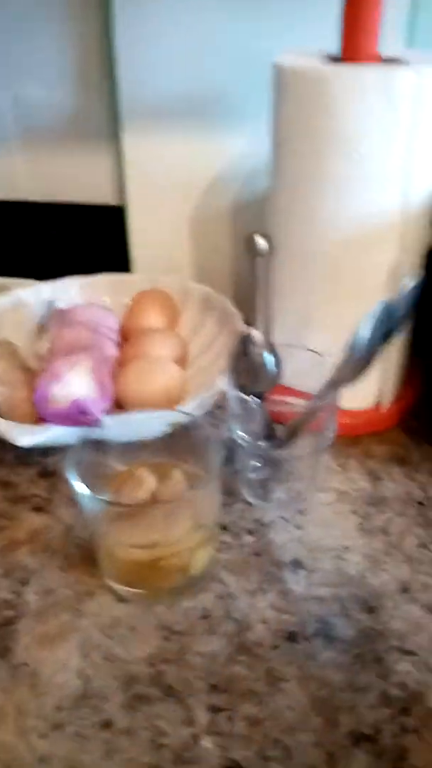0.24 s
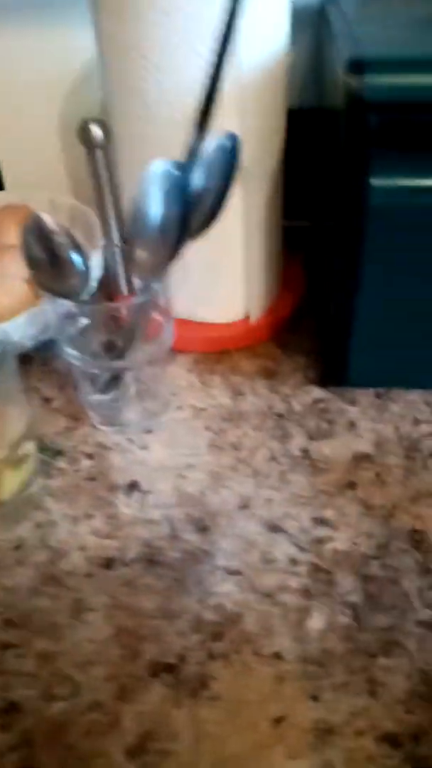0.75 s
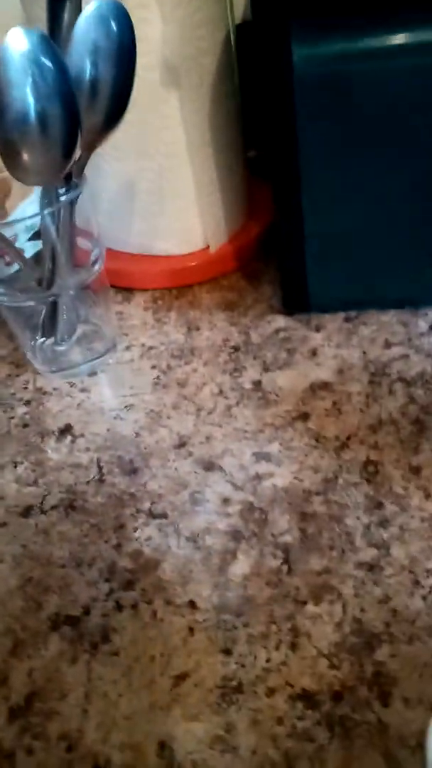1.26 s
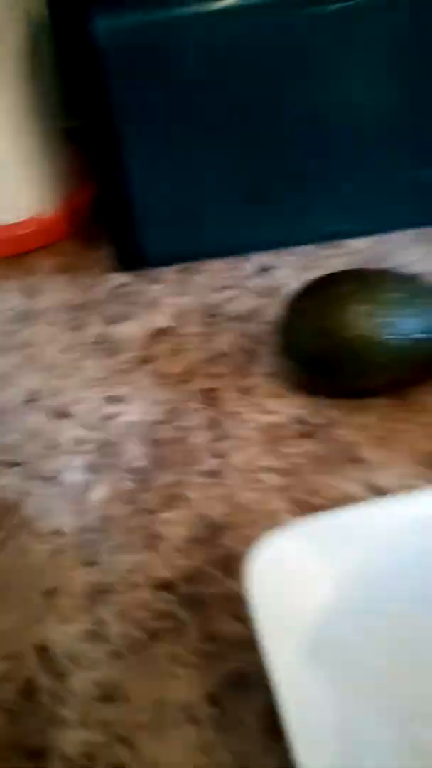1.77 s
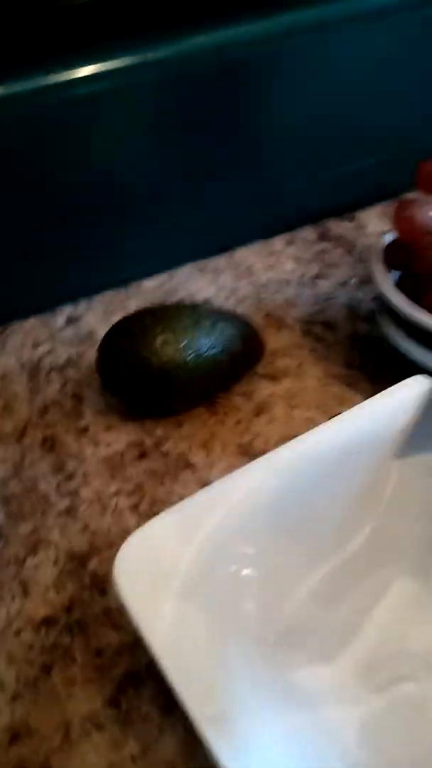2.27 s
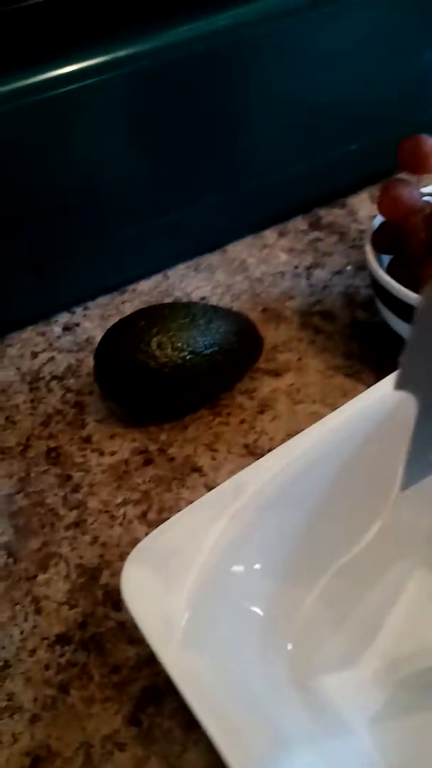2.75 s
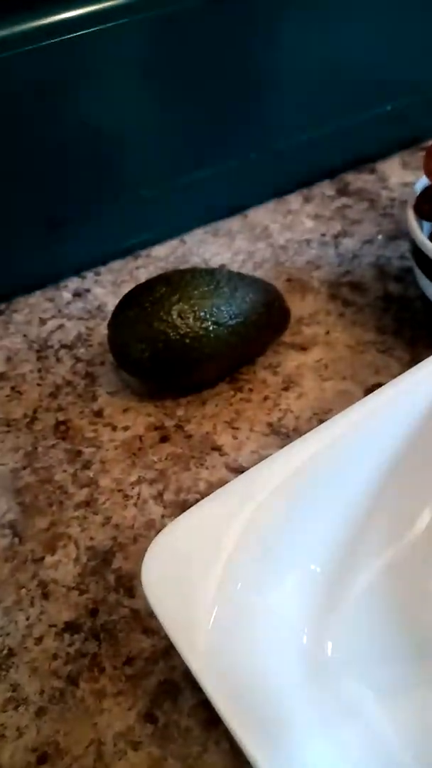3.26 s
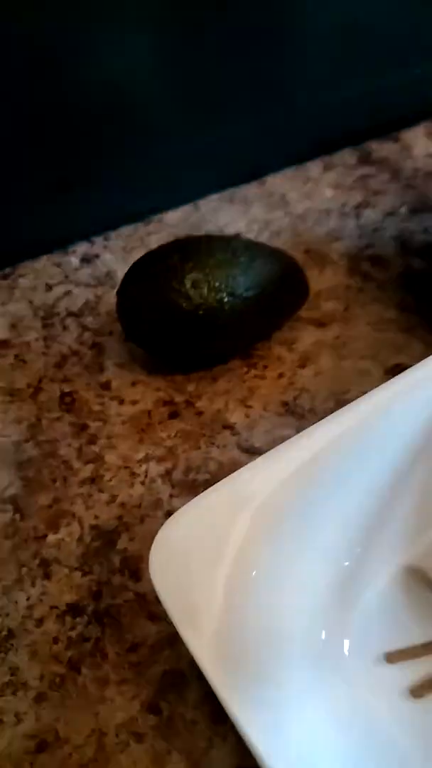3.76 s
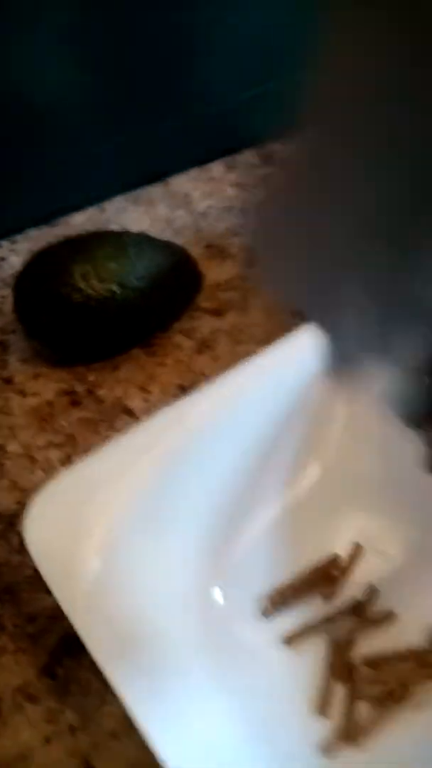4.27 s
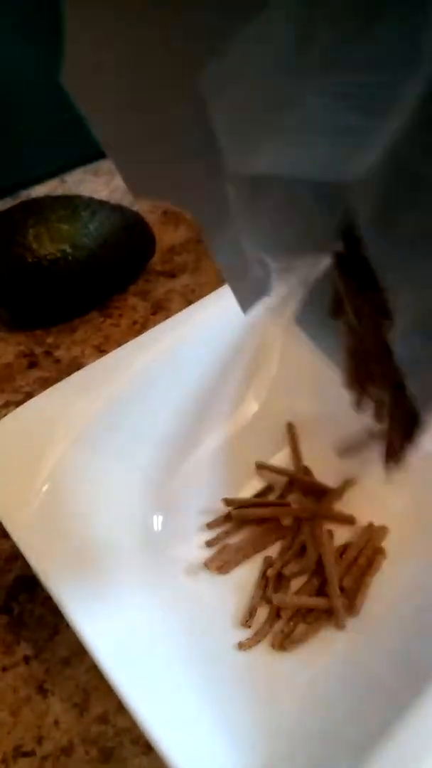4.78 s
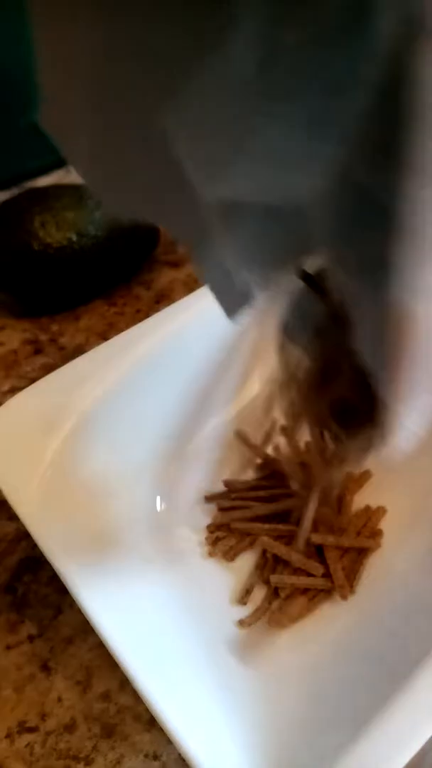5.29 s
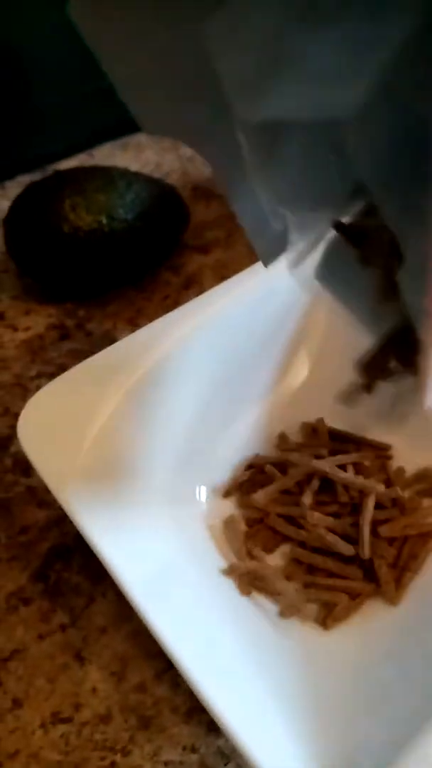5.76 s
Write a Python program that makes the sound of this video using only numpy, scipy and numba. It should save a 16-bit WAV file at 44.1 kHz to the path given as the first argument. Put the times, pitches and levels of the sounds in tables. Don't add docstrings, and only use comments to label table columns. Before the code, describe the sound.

A quiet kitchen, heard close by a stereo phone, with faint still air and a slight uneven whirr. From 0 to 0.5 s there are only tiny film touches and soft hollow knocks of sticks settling. Faint crinkles begin around 0.55 s, and from 0.9 s a plastic bag is lifted with growing crackle, a strong snap near 1.3 s, then sustained rustling that thins out by 2 s. A lull follows, with low dull knocks around 2.4-2.5 s. From 2.75 s the bag crackles again as it tilts, moving from the left toward the centre. At about 3.4 s a sharp crease comes with the first bright, high ceramic pings. Until 6 s, uneven shakes bring dense dry rattling, sliding sticks and loud crisp snaps, strong near 4.5, 5.0 and 5.5 s. Pings grow shorter and duller as the pile covers the bowl; it ends still shaking.

```python
import sys
import numpy as np
from scipy import signal
from scipy.fft import rfft, irfft, next_fast_len
from scipy.io import wavfile
from numba import njit

SR = 44100
rng = np.random.default_rng(int(sys.argv[2]) if len(sys.argv) > 2 else 0)


def invert_db(level):
    return 10 ** (np.asarray(level, dtype=float) / 20)


def transcribe(signal):
    frames = np.atleast_2d(signal).T
    limited = np.clip(frames, -1, 1)
    pcm = np.round(limited * 32767).astype(np.int16)
    wavfile.write(sys.argv[1], SR, pcm)


N = 265771

# (time [s], peak level [dB], mode struck best [Hz])
GLAZE_HITS = [(3.433, -23.5, 8680), (3.5406, -27.5, 8670), (3.5638, -26, 8200), (3.6173, -31, 8190),
              (3.6618, -25, 8190), (3.6941, -34, 8190), (3.7549, -31.5, 8190), (4.0322, -24, 8183),
              (4.0814, -31.5, 9120), (4.1325, -29.5, 9550), (4.4018, -54, 8140), (4.4696, -40.5, 9120),
              (4.5855, -26, 9550), (4.628, -34, 8190), (4.8549, -32, 7370), (4.997, -36, 8190),
              (5.2065, -50, 8690), (5.2436, -33, 9430), (5.3296, -35, 8190), (5.3687, -34.5, 7360),
              (5.3834, -33, 8670), (5.5717, -35, 9080), (5.716, -30, 9110)]
# (frequency [Hz], left [dB per Hz], right [dB per Hz])
PORT_COLOUR = [(39, -42, -31), (92.6, -26.5, 5.5), (231, 3.5, 0.5), (670, -6, 4.5), (1510, -5, -1.5),
               (2190, 3, -0.5), (3240, -4, 0), (5200, 5.5, 3), (7560, 1, 2.5), (9490, -6, 6.5),
               (10900, -12, -5), (12940, -83, -11), (15200, -13, -2), (16400, -50, -24)]


def rustle(count=18000, size=6):
    chance = rng.random((count, 2 + 3 * size))
    s = np.repeat(chance[:, 0] * N / SR, size)
    slip_db = np.minimum(-2.5 * np.log(chance[:, 1]), 10)
    slip_db = np.repeat(slip_db, size)
    pitch, own, late = (c.ravel() for c in np.split(chance[:, 2:], 3, axis=1))
    hz = 50 * 320 ** pitch
    level_db, load_db = bag(s)
    thud_db, rattle_db = load_db + 1, 0.94 * load_db + 5
    low = np.clip(np.log2(1300 / hz), 0, 1)
    mid = np.clip(1 - abs(np.log2(hz / 1700)) / 1.76, 0, 1)
    db = level_db + low * thud_db + mid * rattle_db
    db += slip_db * (1 + .6 * low) + 5 * (2 * own - 1)
    db += 20 * np.log10(hz / 6000) + 4
    return ports(s + .002 * late, hz, 14.12 / hz, 0.64 / hz, db)


def bag(s):
    # (start [s], swell [s], peak level [dB], hold [s],
    # weight of sticks shifting [dB])
    bag_moves = [
        (0.0, 0.0014, -68, 0.012, 8.5),
        (0.077, 0.0081, -78, 0.077, 9),
        (0.541, 0.043, -72, 0.12, 13.5),
        (.62, .12, -68.5, 0.23, 12.5),
        (0.872, 0.11, -62, .1, 9.5),
        (0.94, 0.23, -51, .13, 4),
        (1.275, 0.082, -42.5, 0.62, 1),
        (1.98, 0.034, -77.5, 0.15, 13),
        (2.217, .02, -77.5, 0.026, 16),
        (2.392, 0.019, -77, 0.3, 18.5),
                 (2.48, .26, -60.5, 0.13, 9), (2.79, .04, -54, 0.36, 5.5), (2.9, .18, -46, .15, 3),
               (3.148, 0.13, -45.5, 0.14, 2.5), (3.36, 0.097, -42.5, 0.013, -1.5),
               (3.448, 0.15, -54, .1, -1.5), (3.683, 0.033, -50.5, 0.4, 7), (3.748, 0.21, -43, 0.4, 2.5),
               (4.152, 0.22, -45.5, .04, 2), (4.432, 0.036, -40.5, 0.02, -3),
               (4.518, 0.041, -46, 0.32, 0.5), (4.937, 0.059, -47.5, 0.091, 4.5),
               (4.948, 0.15, -40.5, 0.22, -1.5), (5.248, 0.14, -48.5, .2, -1),
               (5.488, 0.098, -43.5, 0.36, -1), (5.715, 0.014, -58, 0.018, 13),
               (5.952, 0.071, -47, .1, 1.5)]
    swell_db_per_decade, sag_db_per_s, stop_db_per_s, still_db = 27.5, 25.5, 197, -85
    lurch_db, lurch_s = 8.5, 0.043

    t = np.arange(0, N / SR + .002, .002)
    moves = np.array(bag_moves)
    start, swell, peak_db, hold, weight_db = moves.T[:, :, None]
    age = np.maximum(t - start, 1e-9)
    after = np.maximum(age - swell, 0)
    db = peak_db + swell_db_per_decade * np.log10(np.minimum(age / swell, 1))
    db -= sag_db_per_s * after + stop_db_per_s * np.maximum(after - hold, 0)
    power = invert_db(2 * db)
    total = power.sum(axis=0) + invert_db(2 * still_db)
    shift_db = weight_db + lurch_db * np.exp(-age / lurch_s)
    load_db = (power * shift_db).sum(axis=0) / total
    return curve(np.c_[t, 10 * np.log10(total), load_db], s)


def creases(size=48):
    length_s = .0021
    s, peak_db, peak_hz, low_db = (np.repeat(c, size) for c in all_creases().T)
    chance = rng.random((len(s), 3)).T
    hz = 150 * 108 ** chance[0]
    octaves = np.log2(hz / peak_hz)
    near = np.exp(-(octaves / 0.43) ** 2)
    db = 3.7 * near + np.clip(np.log2(2200 / hz), 0, 1) * low_db
    db += 20 * np.log10(hz / peak_hz)
    db -= 3.6 * np.maximum(octaves, 0) * (peak_hz < 3500)
    db += 5 * chance[2] - 6 * chance[1] + 4.8 * (hz > 11000)
    mic_hz, left, right = np.transpose(PORT_COLOUR)
    heard = invert_db(2 * db + np.interp(np.log(hz), np.log(mic_hz), left + right))
    heard = heard.reshape(-1, size).sum(axis=1)
    db += peak_db + 5.5 - 10 * np.log10(np.repeat(heard, size))
    s = s - .0004 + 1.4 * length_s * chance[1] ** 1.4
    return ports(s, hz, 10.76 / hz + 0.45 * length_s * near, 0.75 / hz + .0001, db)


def all_creases():
    # (time [s], peak level [dB], pitch [Hz])
    grips = [(.084, -40, 1260), (.5707, -38, 2120), (.7393, -39, 1250), (.8974, -56.5, 1250),
             (.9598, -20, 7560), (1.079, -27.5, 4370), (1.103, -26.5, 1160), (1.1289, -24, 4440),
             (1.1537, -20, 4360), (1.1982, -42, 1080), (1.2452, -22.5, 1260), (1.2865, -24, 2100),
             (1.314, -20.5, 4570), (1.3284, -12, 2010), (1.5572, -23, 4520), (1.8408, -26, 4710),
             (2.102, -40, 2180), (2.141, -55, 1760), (2.2409, -42, 1960), (2.403, -43, 1190),
             (2.7495, -46, 2420), (2.7612, -30, 4800), (2.8285, -25.5, 2230)]
    slumps = [(3.0216, -18.5, 5300), (3.0725, -18, 4500), (3.238, -19.5, 5230), (3.246, -23, 8600),
              (3.274, -15.5, 9070), (3.3314, -21.5, 6800), (3.6926, -22, 8500), (3.8188, -19, 8050),
              (3.838, -21, 9050), (3.8652, -13.5, 5550), (4.061, -13, 6350), (4.1785, -18, 9250),
              (4.2846, -18, 6900), (4.3695, -15.5, 5540), (4.4, -19, 5940), (4.4698, -9.5, 9000),
              (4.5499, -13.5, 9200), (4.6714, -14.5, 7350), (4.7821, -22, 5400), (4.943, -27.5, 9400),
              (4.9727, -10, 5870), (4.982, -16, 6000), (5.0231, -22, 5470), (5.0515, -16, 5030),
              (5.062, -17, 5230), (5.1533, -17.5, 6510), (5.259, -17, 6260), (5.5708, -20, 6440),
              (5.6078, -13, 5400), (5.8172, -16.5, 5800)]
    snaps = [(.003, -37.5, 1440), (.5951, -28.5, 1360), (.606, -29.5, 1390), (.9159, -31.5, 1862),
             (1.0221, -25, 1940), (1.3554, -17, 6240), (1.7181, -29, 5430), (1.7689, -22, 5300),
             (1.7989, -19.5, 5000), (1.8592, -29, 5460), (1.9471, -26, 4700), (2.0383, -30, 5400),
             (2.8864, -25, 3180), (3.0031, -19, 2030), (3.2211, -15, 5150), (3.4102, -10, 8500),
             (3.481, -27, 9400), (3.7874, -22, 8500), (3.9021, -11.5, 7000), (4.3192, -21, 2500),
             (4.7402, -13, 5550), (5.176, -30, 5240), (5.1842, -11.5, 5640), (5.5414, -10, 5500),
             (5.6826, -20, 5510), (5.7265, -11.5, 2260), (5.744, -13, 5750), (5.855, -24.5, 9490),
             (6.0058, -12.5, 5470)]
    ticks = np.array(GLAZE_HITS) + np.array([0, 2, 0])
    kinds = [(grips, 0.5), (slumps, 2.5), (snaps, -5.5), (ticks, -5.5)]
    return np.concatenate([np.c_[rows, np.full(len(rows), low_db)] for rows, low_db in kinds])


def bowl():
    mode_hz = [3047, 4000, 4990, 7372, 7709, 8183, 8662, 9107, 9553, 9817, 11053, 11264, 11992, 12600,
               13265, 13526]
    # (left level [dB], right level [dB], t60 [s])
    mode_rows = [(-27, -39, .13), (-11, -21, 0.2), (-15, -40, .1), (-18.5, 0, 0.11), (-25, -20, .12),
                 (-6.5, -2.5, 0.17), (-25, -1, 0.21), (-5, 3, 0.079), (-12, -2, 0.16), (-31, -2, 0.11),
                 (-16, -5.5, 0.17), (-25, -12, 0.13), (-17, -2.5, 0.098), (-30, -26, .1), (-42, -16, .09),
                 (-42, -22, .1)]
    outer_db = np.tile([1, 3.5], (len(GLAZE_HITS), 1))
    hits = np.r_[np.c_[GLAZE_HITS, outer_db], stray_pings()]
    s, peak_db, best_hz, high_db, low_db = (np.repeat(c, len(mode_hz)) for c in hits.T)
    hz, left, right, t60 = np.tile(np.c_[mode_hz, mode_rows].T, len(hits))
    db = peak_db + 8 * np.exp(-((hz - best_hz) / 220) ** 2)
    db += 1.6 * rng.standard_normal(len(s))
    db += high_db * (hz > 10500) + low_db * (hz < 6000)
    db += (left + right) / 2 - 10.5
    t60 = t60 / (1 + .45 * (s - s[0]))
    rise = np.full(len(s), 0.00069)
    twin = ports(s, hz * 1.0045, .8 * t60, rise, db - 9, left - right)
    return ports(s, hz, t60, rise, db, left - right) + twin


def stray_pings(count=60, start_s=3.4):
    chance = rng.random((count, 3)).T
    s = start_s + (N / SR - start_s) * chance[0] ** 1.6
    peak_db = bag(s)[0] + 2.5 + 8 * chance[1]
    return np.c_[s, peak_db, 8000 + 1900 * chance[2], 0 * s - 5.5, 0 * s - 11]


def taps(size=6, t60_s=0.046):
    # (time [s], peak level [dB], pitch [Hz])
    knocks = [(0.009, -49.5, 1277), (0.1, -62, 990), (0.289, -63, 1020), (0.332, -59.5, 1003),
              (0.344, -63, 1170), (0.394, -59, 1030), (0.405, -69, 1090), (2.403, -52, 480),
              (2.432, -62, 440), (2.469, -51.5, 460), (2.49, -57, 650), (2.519, -51.5, 674)]
    s, peak_db, hz = (np.repeat(c, size) for c in np.transpose(knocks))
    chance = rng.random((len(s), 3)).T
    octave = chance[0] > .7
    hz = hz * (1 + octave) * (0.885 + 0.27 * chance[1])
    db = peak_db - 3 - 4 * octave
    return ports(s + 0.0041 * chance[2], hz, t60_s + 0 * s, 0.0008 + 0 * s, db)


def room_tone(count=1500):
    # (frequency [Hz], level [dB per Hz])
    air_colour = [(30, -9.5), (60, -22), (110, 1.5), (215, -5.5), (355, -14), (1000, -23.5), (1500, -13.5),
                  (2600, -20), (6400, -26.5), (9300, -42), (11200, -38), (16000, -42)]
    air_db, whirr_hz, whirr_db = -73.5, 2010, -75.5
    noise = rng.standard_normal((3, N))
    air = np.array([shaped(n + 0.28 * noise[2], *np.transpose(air_colour)) for n in noise[:2]])
    chance = rng.random((count, 3)).T
    s = chance[0] * N / SR
    hz = whirr_hz * (.88 + .2 * chance[1])
    whirr = ports(s, hz, .05 + 0 * s, .003 + 0 * s, whirr_db + 8 * chance[2])
    return air * invert_db(air_db) / np.std(air) + whirr


def ports(s, hz, t60, rise, db, pan_db=0, alike_hz=1500):
    # (time [s], left lead [samples], left minus right [dB])
    place = [
        (0, 36.7, 6.5),
        (2, 29.5, 3),
        (3.5, 29, 3.5),
        (5, 24, -0.5),
        (6, 22.3, -0.5),
    ]
    hz = np.minimum(hz, .45 * SR)
    chance = rng.standard_normal((len(s), 4)).T
    unlike = np.minimum(hz / alike_hz, 1)
    turn = 10 * chance[3]
    lead, place_db = curve(place, s)
    pan_db = pan_db + place_db
    left_amp = invert_db(db + pan_db / 2 + 2.2 * unlike * chance[0])
    right_amp = invert_db(db - pan_db / 2 + 2.4 * unlike * chance[2])
    left = ring(s * SR - lead / 2, hz, t60, rise, left_amp, turn + 2.06 * unlike * chance[1])
    right = ring(s * SR + lead / 2, hz, t60, rise, right_amp, turn)
    return np.array([left, right])


@njit
def ring(start, hz, t60, rise, size, turn):
    out = np.zeros(N + SR)
    for k in range(len(hz)):
        step = np.exp(2j * np.pi * hz[k] / SR - np.log(1000) / (t60[k] * SR))
        z = size[k] * np.exp(1j * turn[k])
        i = max(int(start[k]), 0)
        shut = 1.
        soften = np.exp(-1 / (rise[k] * SR))
        for j in range(min(int(.8 * t60[k] * SR), SR - 99)):
            shut *= soften
            out[i + j] += z.imag * (1 - shut)
            z *= step
    return out[:N]


def through_mics(x):
    hz, left, right = np.transpose(PORT_COLOUR)
    size = next_fast_len(N + SR)
    f = np.fft.rfftfreq(size, 1 / SR) + 1
    lean = np.interp(np.log(f), np.log(hz), left - right) / 2
    x = irfft(rfft(x, size) * invert_db(np.array([lean, -lean])), size)[:, :N]
    return np.array([shaped(v, hz, (left + right) / 2) for v in x])


def kitchen(x):
    counter = echoes(t60_s=.015, db=-8, low_hz=2500)
    walls = echoes(t60_s=.25, db=-11, low_hz=300)
    return x + signal.fftconvolve(x, counter + walls, axes=1)[:, :N]


def echoes(t60_s, db, low_hz):
    t = np.arange(SR // 2) / SR
    tail = rng.standard_normal((2, len(t))) * invert_db(-60 * t / t60_s)
    tail *= np.minimum(10 * t / t60_s, 1)
    tail = signal.sosfilt(signal.butter(2, low_hz, "high", fs=SR, output="sos"), tail)
    return tail * invert_db(db) / np.sqrt(np.sum(tail ** 2, axis=1, keepdims=True))


def shaped(x, hz, db):
    f = np.fft.rfftfreq(4096, 1 / SR) + 1
    cep = irfft(np.interp(np.log(f), np.log(hz), db) * np.log(10) / 20)
    cep = np.r_[cep[0], 2 * cep[1:len(f) - 1], np.zeros(len(f) - 1)]
    return signal.fftconvolve(x, irfft(np.exp(rfft(cep))))[:N]


def curve(rows, s):
    t, *columns = np.transpose(rows)
    return [np.interp(s, t, c) for c in columns]


def scene():
    film = through_mics(rustle() + creases())
    return kitchen(film + taps() + bowl()) + room_tone()


def band_limit(x):
    return signal.sosfilt(signal.butter(12, 16800, fs=SR, output="sos"), x)


def record(dry):
    soft = .22 * np.tanh(dry / .22)
    low_pass = signal.ellip(8, .3, 50, 16400, fs=SR, output="sos")
    mix = signal.sosfilt(low_pass, soft)
    return band_limit(mix)


dry = scene()
out = record(dry)
transcribe(out)
```